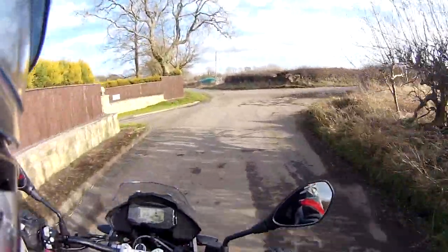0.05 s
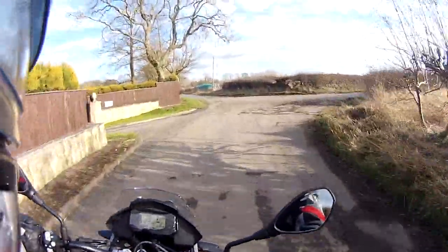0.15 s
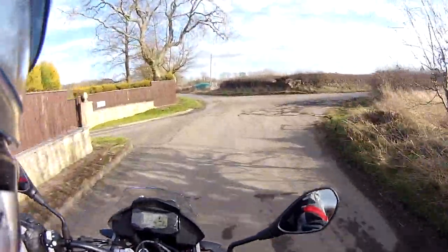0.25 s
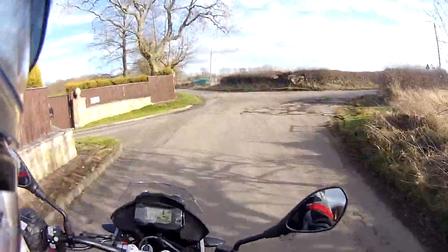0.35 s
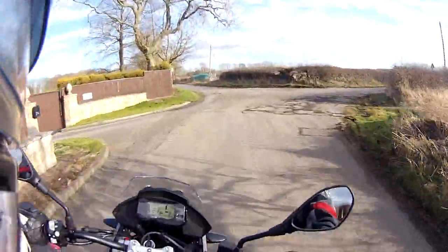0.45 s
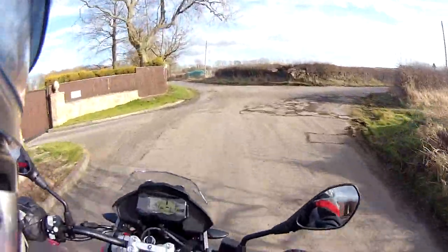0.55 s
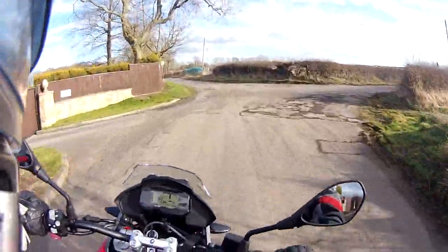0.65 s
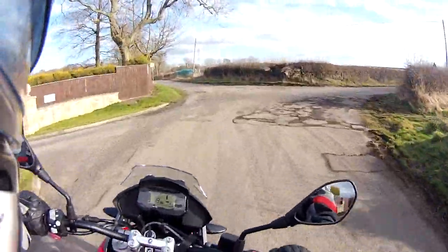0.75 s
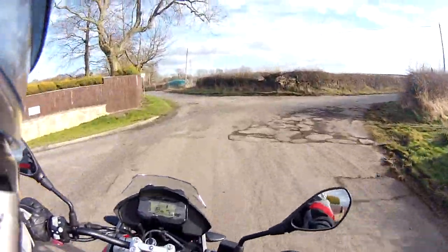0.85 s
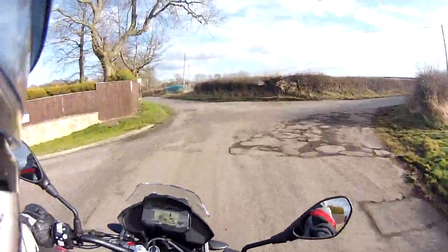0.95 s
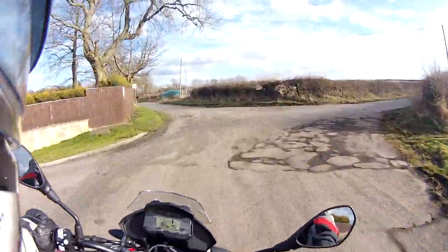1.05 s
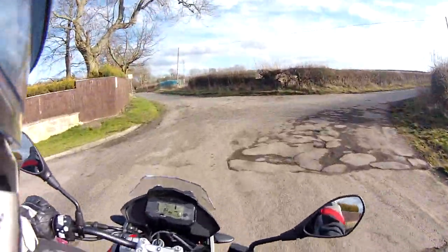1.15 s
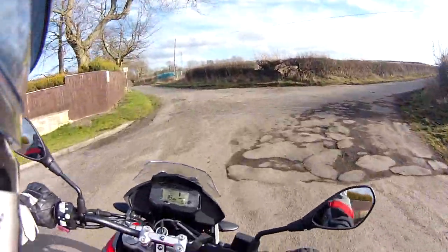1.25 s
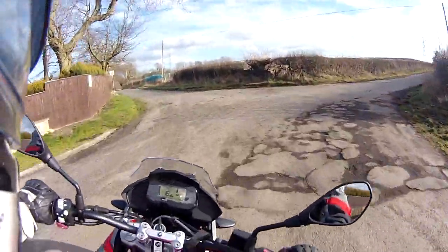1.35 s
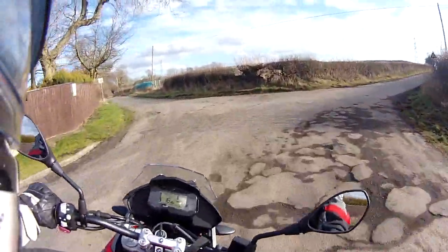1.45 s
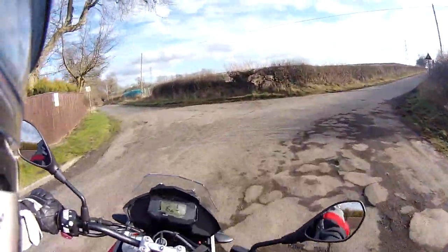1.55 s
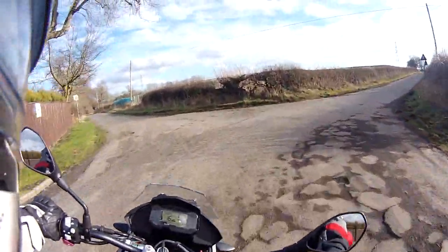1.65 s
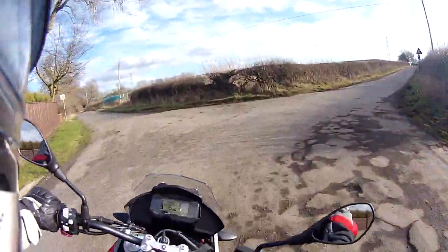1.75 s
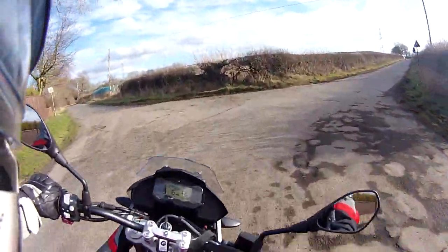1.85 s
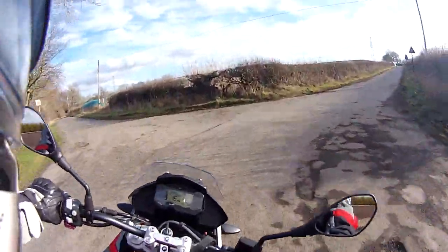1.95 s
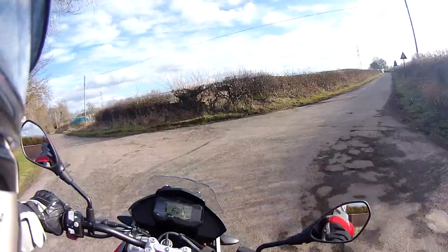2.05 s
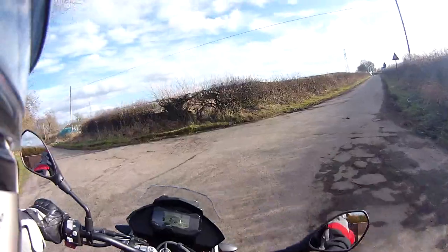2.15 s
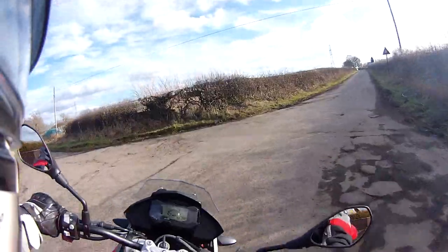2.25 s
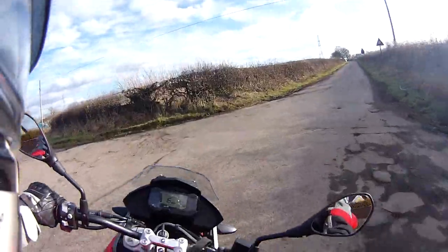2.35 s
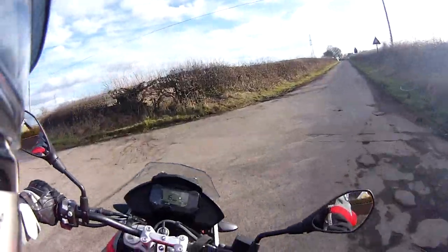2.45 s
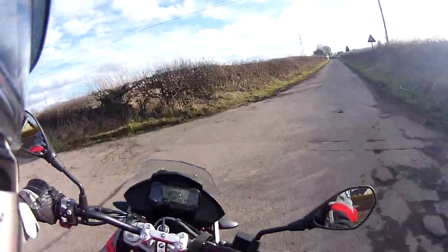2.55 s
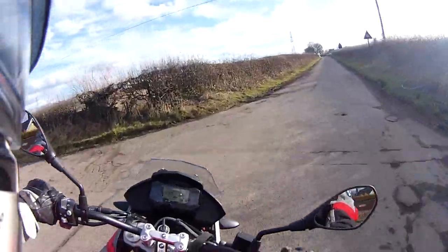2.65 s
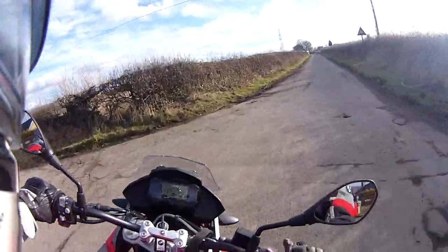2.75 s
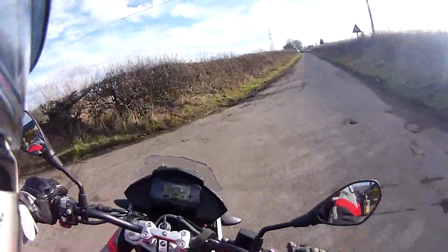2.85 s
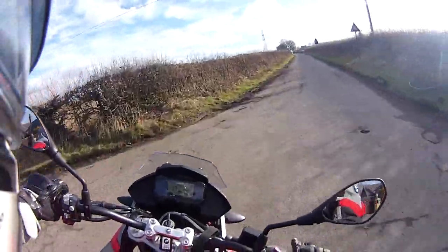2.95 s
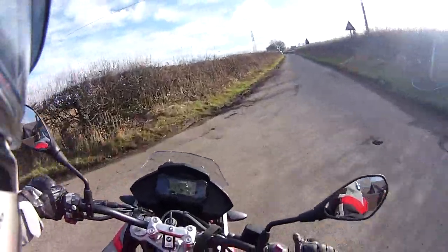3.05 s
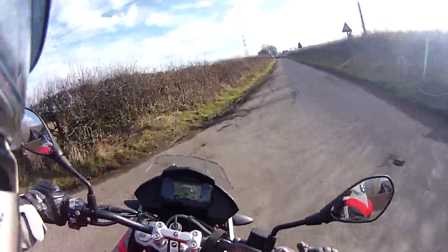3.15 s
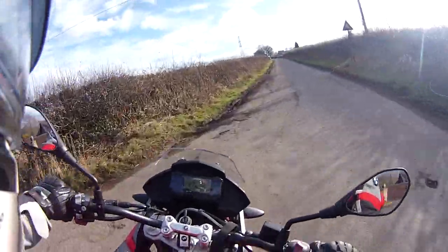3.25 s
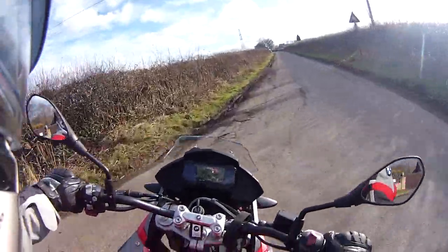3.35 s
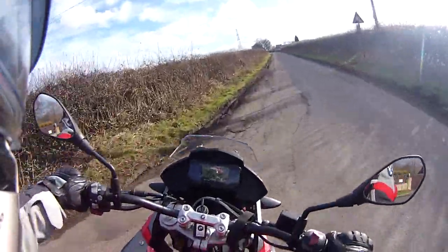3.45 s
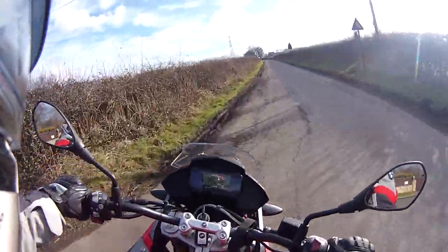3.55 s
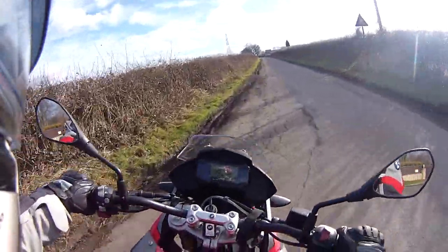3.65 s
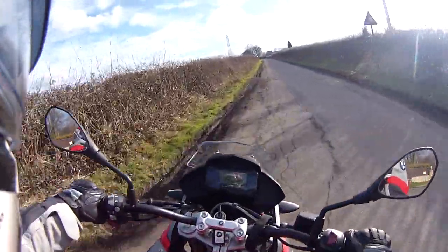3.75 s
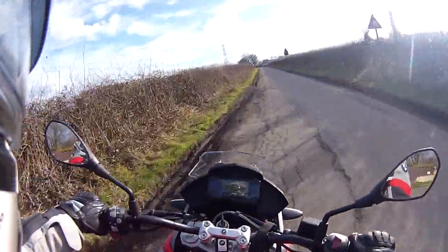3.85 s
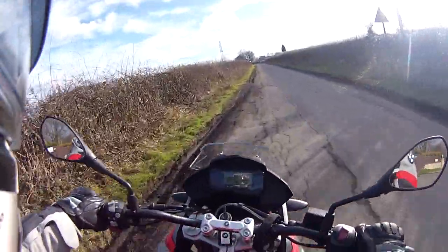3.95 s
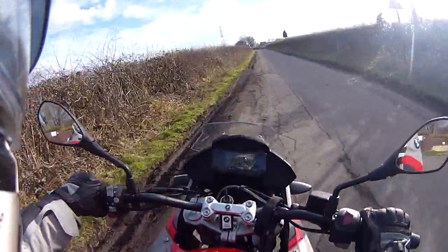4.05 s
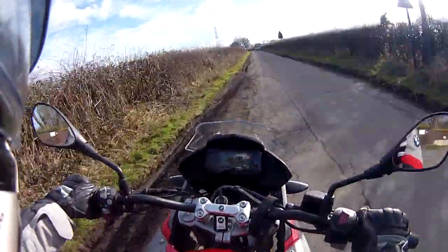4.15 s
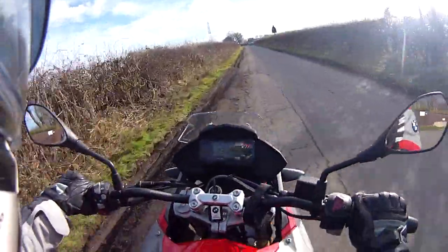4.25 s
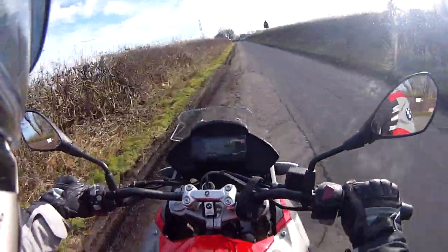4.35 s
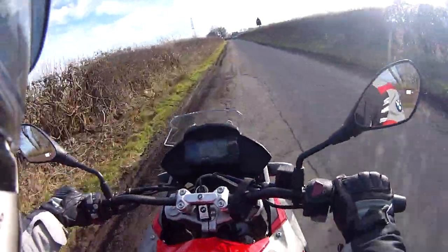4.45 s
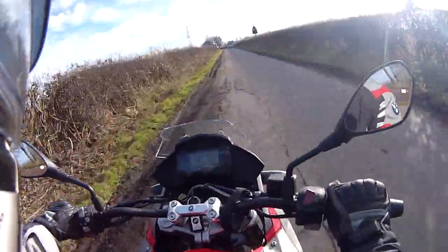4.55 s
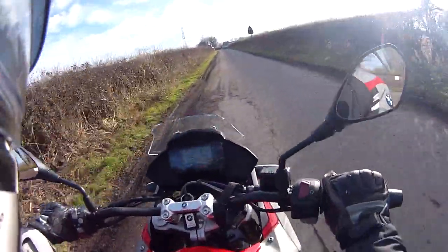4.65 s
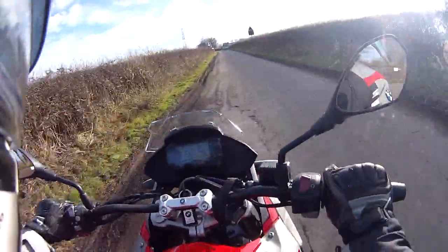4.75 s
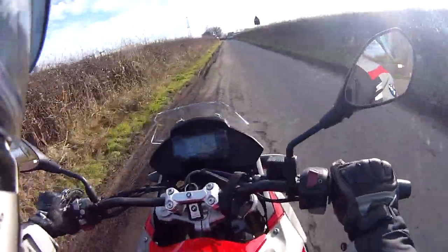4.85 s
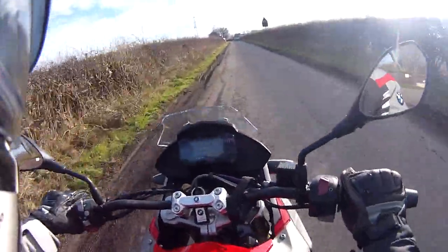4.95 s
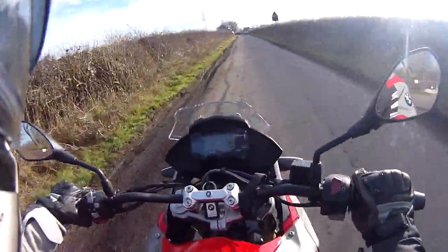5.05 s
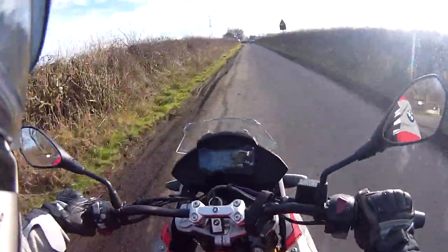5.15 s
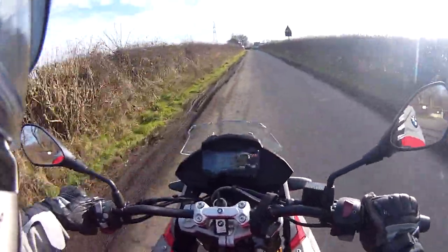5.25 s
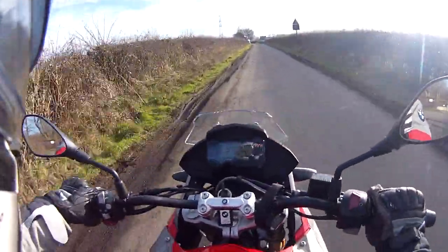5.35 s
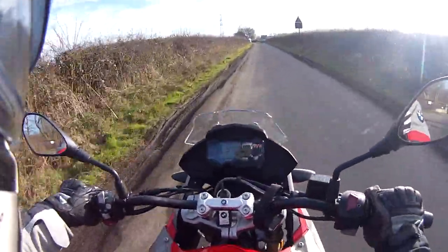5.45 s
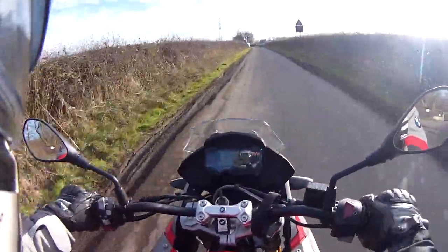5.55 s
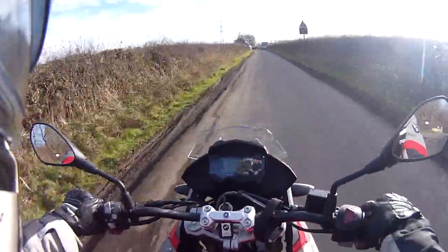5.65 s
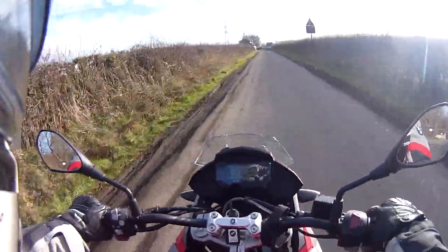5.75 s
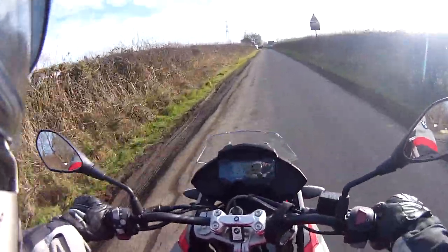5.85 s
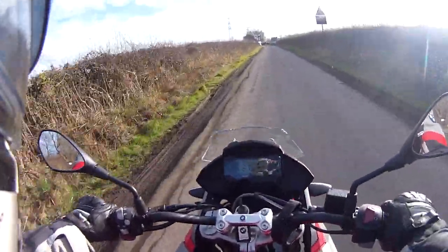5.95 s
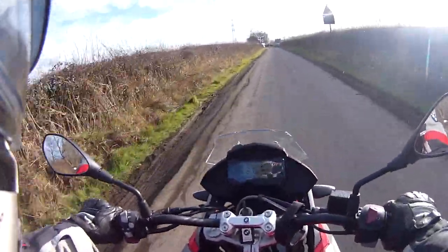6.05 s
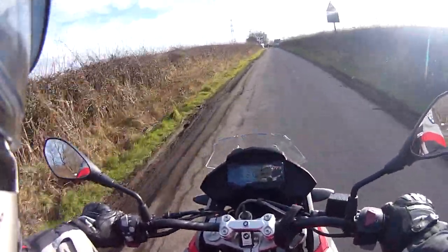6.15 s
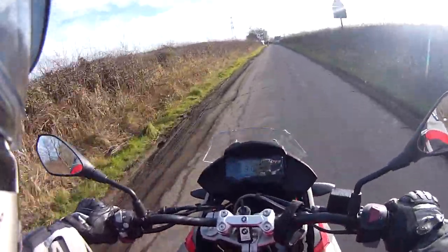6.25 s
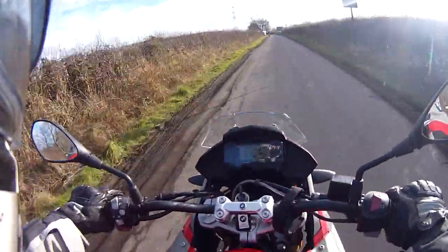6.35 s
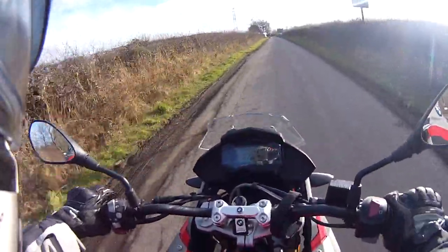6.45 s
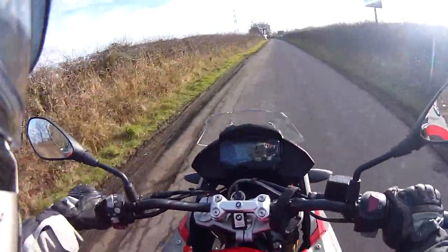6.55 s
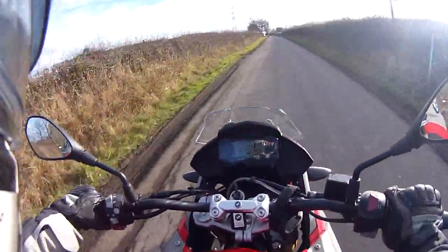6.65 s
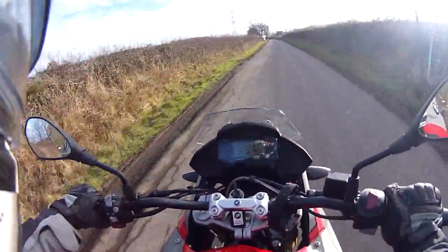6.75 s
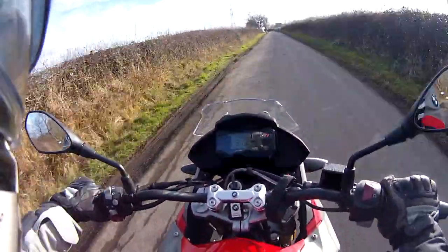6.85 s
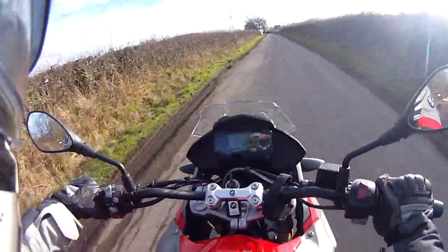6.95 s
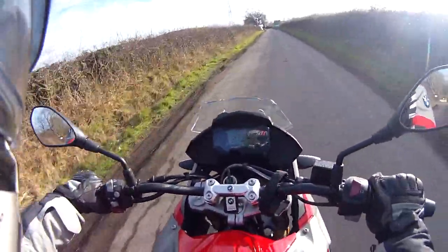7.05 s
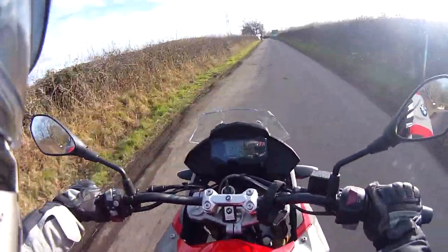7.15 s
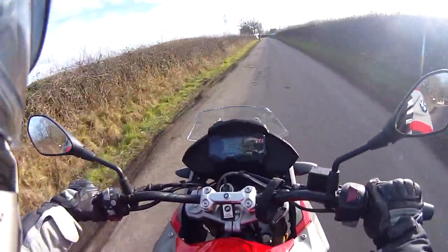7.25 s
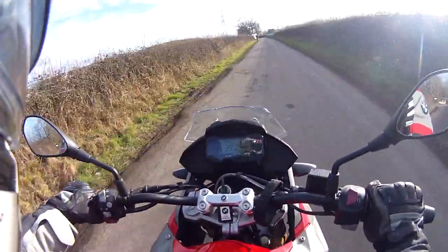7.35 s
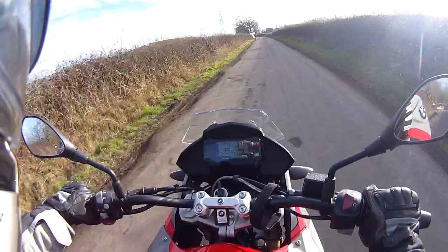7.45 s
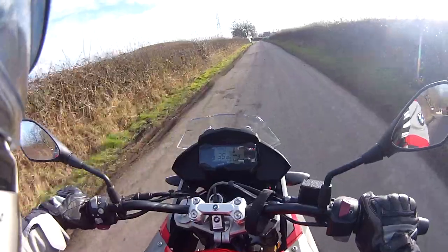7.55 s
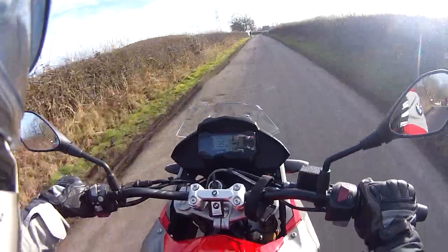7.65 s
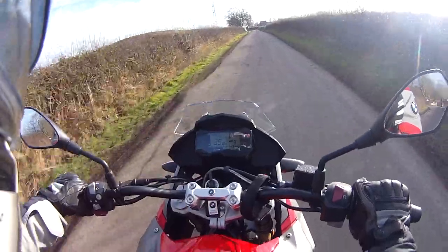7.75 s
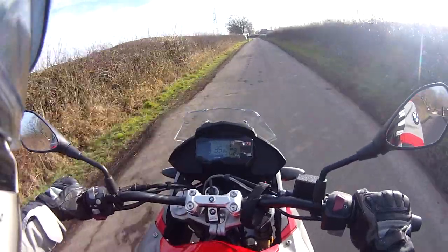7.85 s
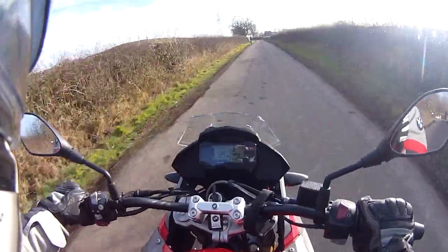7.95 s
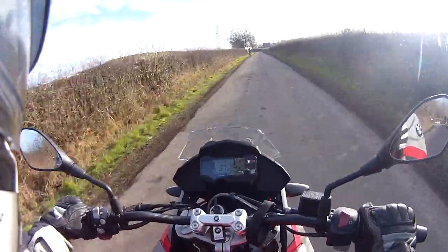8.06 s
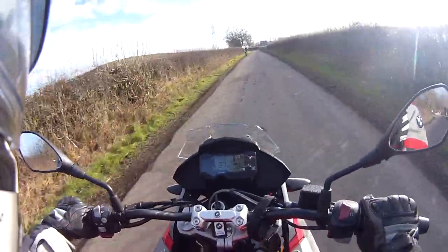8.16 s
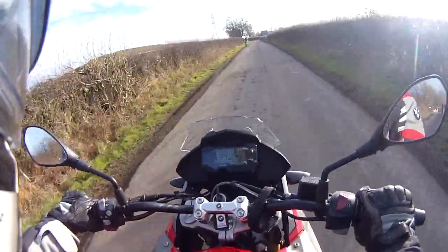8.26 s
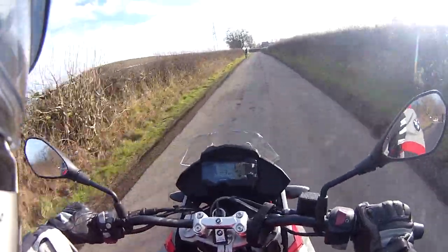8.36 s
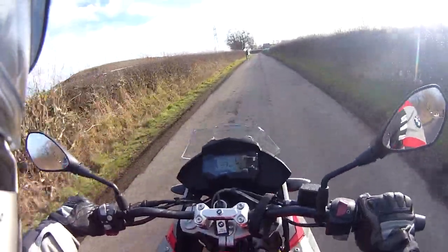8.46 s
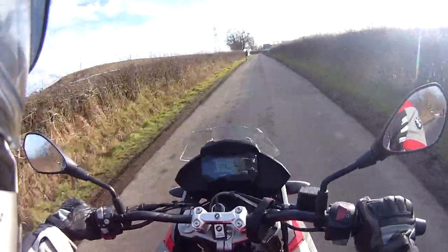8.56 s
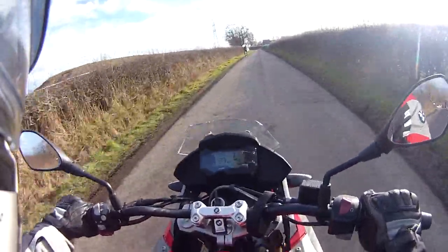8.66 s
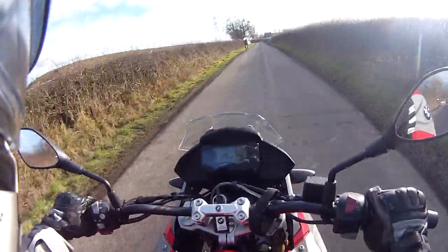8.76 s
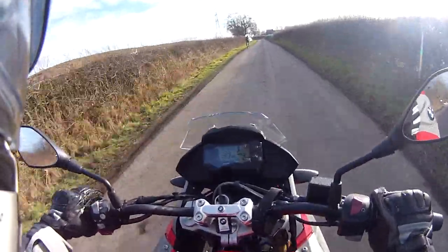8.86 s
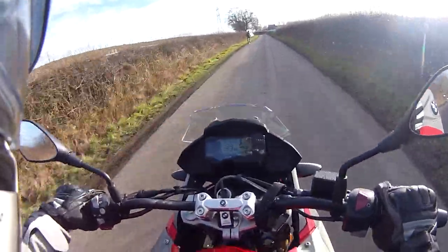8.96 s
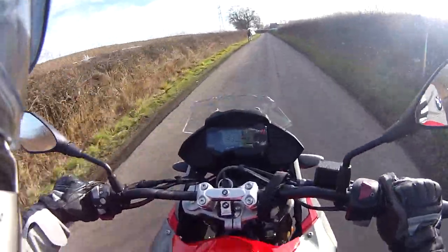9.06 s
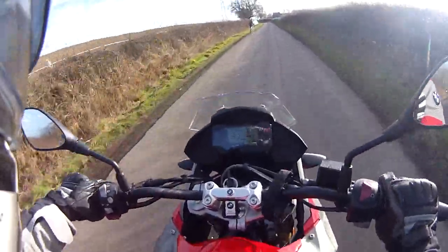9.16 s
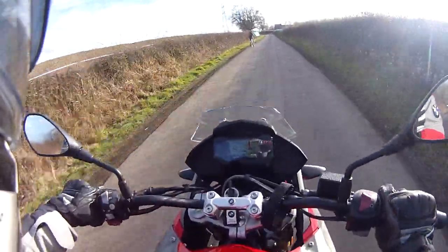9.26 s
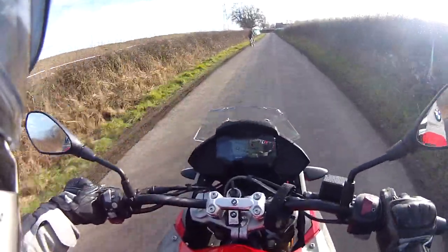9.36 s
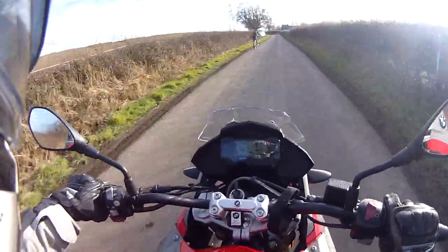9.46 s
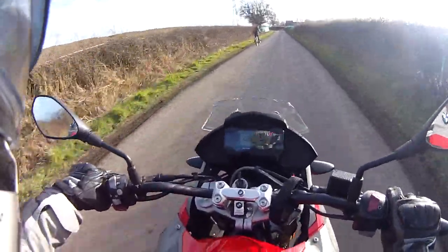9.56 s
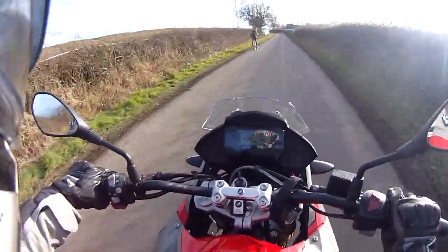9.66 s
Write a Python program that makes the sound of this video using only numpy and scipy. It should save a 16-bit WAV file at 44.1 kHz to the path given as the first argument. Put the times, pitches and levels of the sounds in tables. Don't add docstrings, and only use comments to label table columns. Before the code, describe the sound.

From 0 to 3 s a single-cylinder motorcycle rolls through a bend at low, wavering revs, its separate exhaust thuds soft and lumpy, over valve clatter, chain noise, tyre hiss and a faint thin electric whine. Small grit ticks and rattles accompany the broken surface, with a duller knock near 0.4 s. From about 3 s it pulls harder, the pitch rising steadily to a fast, hollow, ringing throb by 5.6 s. The throttle then closes, with a short rattle, and the note drops sharply around 6 s for a gear change; a brief swish passes from a roadside sign. Power returns and the revs climb steadily to the end at 9.7 s. Wind at the rider's helmet microphone grows from low rumble to strong buffeting, with blunt slaps clustered around 6.2, 6.9, 8.1, 8.6 and 9.4 s, some briefly ducking everything. The sound is close, almost mono, outdoors.

```python
import sys
import numpy as np
from scipy import signal
from scipy.fft import rfft, irfft, next_fast_len
from scipy.io import wavfile
from scipy.ndimage import uniform_filter1d, map_coordinates

SR = 44100
rng = np.random.default_rng(int(sys.argv[2]) if len(sys.argv) > 2 else 0)


def pcm_store(signal):
    levels = np.round(np.clip(np.atleast_2d(signal), -1, 1) * 32767)
    wavfile.write(sys.argv[1], SR, levels.astype(np.int16).T)


def nominal_scale(level):
    x = np.asarray(level, float) / 20
    return 10 ** x


N = 428211
SHIFT_S = 6.0

# (time [s], throttle [0-1])
THROTTLE = [(0, 0.77), (.9, 0.55), (1.05, 0.43), (1.47, 0.68), (1.6, 0.32), (1.8, 0.8), (3.1, 0.86),
            (3.5, 0.95), (4.5, 0.96), (5.555, 0.95), (5.63, 0.45), (6.07, 0.1), (6.2, 0.61), (6.38, 0.69),
            (6.48, 0.99), (7.5, 0.92), (8.85, 0.84), (9.71, 0.75)]


def unit(x):
    return x / np.sqrt(np.mean(x ** 2) + 1e-20)


def along(points, hz):
    f, v = np.transpose(points)
    return np.interp(np.log(hz + 1), np.log(f + 1), v)


def curves(rows):
    s, *cols = np.transpose(rows)
    return [np.interp(np.arange(N) / SR, s, c) for c in cols]


def wobble(rate_hz):
    knots = rng.standard_normal(int(N * rate_hz / SR) + 4)
    return map_coordinates(knots, [np.arange(N) * rate_hz / SR])


def steady(x, size):
    power = uniform_filter1d(uniform_filter1d(x ** 2, size), size)
    return x / np.sqrt(np.abs(power) + 1e-20)


def filtered(x, response):
    m = next_fast_len(N + SR // 2)
    return irfft(rfft(x, m) * response(np.fft.rfftfreq(m, 1 / SR)), m)[..., :N]


def rush(spectrum, patchy_db):
    z = signal.stft(rng.standard_normal(N), nperseg=512)[2]
    field = uniform_filter1d(rng.standard_normal(z.shape), size=6, axis=0)
    field = uniform_filter1d(field, size=10, axis=1)
    x = signal.istft(z * nominal_scale(patchy_db * unit(field)), nperseg=512)[1][:N]
    return unit(filtered(x, lambda hz: nominal_scale(along(spectrum, hz))))


def puff(cycle, sharp):
    return unit(np.exp(sharp * np.cos(2 * np.pi * cycle)))


def firing_hz(cycle):
    return np.gradient(cycle) * SR


def effort(cycle, open_db, shut_db, rise_db, full_hz=100):
    hz = np.minimum(firing_hz(cycle), full_hz)
    return open_db + shut_db * (1 - curves(THROTTLE)[0]) + rise_db * np.log2(hz / min(full_hz, 45))


def exhaust(cycle):
    # (multiple of firing rate, level [dB])
    orders = [(1, -32), (2, -10), (3, -8), (4, 1), (5, -10.5), (6, -13), (7, -2), (8, -6), (10, -3),
              (12, -2), (15, -5)]
    # (frequency [Hz], gain [dB])
    pipe = [(25, -57), (60, 6), (150, 5.5), (190, -2.5), (235, 8.5), (270, 13.5), (330, -4), (450, -4),
            (680, -14), (790, -3.5), (900, -44), (2000, -45), (2600, -27)]
    sound, hz = np.zeros(N), firing_hz(cycle)
    multiple, shape_db = np.transpose(orders)
    db = effort(cycle, open_db=-19.5, shut_db=-12, rise_db=17.5, full_hz=36.55)
    pull = np.clip(5 * curves(THROTTLE)[0] - 3.75, 0, 1)
    low_gear = np.arange(N) < SHIFT_S * SR
    lug_hz, thump_hz = 32.7, 42.2
    shake_db = 2 - 23.5 * np.clip((lug_hz - hz) / 3, 0, 1) * pull
    thump_db = 8.5 * np.clip((thump_hz + 2 - hz) / 3, 0, 1) * pull * low_gear
    for k in range(1, 37):
        drift_db, slip = 1.5 * wobble(7), .008 * k * wobble(12)
        level_db = along(pipe, k * hz) + 1.05 * np.interp(k, multiple, shape_db) + drift_db
        level_db = level_db + (k == 4) * shake_db + (k == 2) * thump_db
        spread = rng.uniform(0, 2 * np.pi) * (k < 11)
        sound += nominal_scale(level_db) * np.sin(2 * np.pi * k * (cycle + 0.028) + spread + slip)
    return nominal_scale(db + 1.27) * steady(sound, size=5000)


def airbox(cycle):
    # (centre [Hz], width [Hz], gain [dB])
    modes = [(1015, 90, -6), (1092, 55, 3.5), (1190, 65, 0), (1275, 70, -5), (1890, 170, -16)]
    lead, lead_low_gear, second, second_low_gear, wander = .17, .13, .29, .05, .009
    hz, low_gear = firing_hz(cycle), np.arange(N) < SHIFT_S * SR
    hard = low_gear * np.clip((hz - 38) / 13, 0, 1)
    turn = cycle + lead + lead_low_gear * hard + wander * (hz / 46) ** 2.5 * wobble(14)
    echo = .5 + .3 * np.log2(hz / 45) + .6 * hard ** 3
    second_late = second + second_low_gear * low_gear + .3 * wander * wobble(3)
    blows = np.zeros(N)
    for late, size in ((0, np.ones(N)), (second_late, echo)):
        slam = np.flatnonzero(np.diff(np.floor(turn - late)) > 0)
        luck = rng.standard_normal((500, 2))[:len(slam)]
        at = np.clip(slam + np.round(1.5 * luck[:, 0]).astype(int), 0, N - 1)
        blows[at] += size[slam] * nominal_scale(1.2 * luck[:, 1])
    gulp = (hz / 44) ** 3.5
    drive = blows + gulp * .008 * puff(cycle - .2, sharp=.5) * rng.standard_normal(N)

    def box(f):
        return sum((-1) ** k * nominal_scale(g) * 1j * f * w / (c * c - f * f + 1j * f * w)
                   for k, (c, w, g) in enumerate(modes))

    def duct(f):
        return (1 + 1j * f / 2300) ** -4 * (1j * f / (700 + 1j * f)) ** 2

    ring = steady(filtered(drive, lambda f: box(f) * duct(f)), size=4000)
    return nominal_scale(effort(cycle, open_db=-17, shut_db=-39, rise_db=36, full_hz=42.35)) * ring


def road(cycle):
    # (frequency [Hz], density [dB per Hz])
    gear_colour = [(150, -9), (300, -1.5), (610, 3), (710, -1.5), (775, 3), (870, 2.5), (1450, 1.5),
                   (1650, -0.5), (1950, 2), (2300, -5.5), (3700, -13.5), (4060, -14.5), (4350, -23),
                   (5200, -58), (8000, -90)]
    # (frequency [Hz], density [dB per Hz])
    tappet_colour = [(2800, -40), (3850, -3), (4120, -0.5), (4400, -19.5), (9000, -29), (12400, -22),
                     (13200, -23), (15400, -40)]
    # (frequency [Hz], density [dB per Hz])
    hiss_colour = [(2650, -25), (4500, 4), (4960, -7), (5670, -2.5), (6320, -8), (6690, -9.5), (7230, -1),
                   (8050, -8.5), (8920, 1), (10100, -4.5), (10300, -4.5), (10900, -3), (12000, -6),
                   (13400, -21), (15400, -27)]
    # (frequency [Hz], density [dB per Hz])
    sign_colour = [(1470, -38), (2500, -15), (2800, -15), (3440, 2), (3920, 5), (4260, -3.5), (5910, -5),
                   (7830, -23), (10800, -4.5), (12600, -11), (15400, -34)]
    # (time [s], gain [dB])
    hedge = [(0, -0.4), (2.9, 1.5), (3.4, 4), (4.08, 4), (4.46, -3), (4.56, 2.8), (5.3, 0.45), (6.4, 3.4),
             (7.1, -0.5), (7.5, 2.6), (8.2, 0.2), (9.71, -2.4)]
    # (time [s], gain [dB])
    potholes = [(.01, 2.5), (1.78, 3), (1.97, 2.5), (2.22, 3), (2.32, 2.2), (3.35, 2.2)]
    jolt_s, sign_s, sign_wide_s, sign_db = 0.023, 6.16, .16, -33.5
    t = np.arange(N) / SR
    near_db = curves(hedge)[0] + sum(db * np.exp(-((t - s) / jolt_s) ** 2) for s, db in potholes)
    gear_db = near_db + effort(cycle, open_db=-29, shut_db=-7, rise_db=3)
    hiss_db = near_db + effort(cycle, open_db=-45, shut_db=-5, rise_db=5.5)
    tappet_db = effort(cycle, open_db=-50.5, shut_db=0, rise_db=-5)
    shake = 0.39 * wobble(11) + 0.17 * wobble(40)
    throb = puff(cycle - .05, sharp=0.059) * puff(2 * cycle, sharp=0.017)
    gear = nominal_scale(gear_db + 3 + shake) * throb * rush(gear_colour, patchy_db=0.62)
    tappets = nominal_scale(tappet_db) * puff(cycle, sharp=0.42) * rush(tappet_colour, patchy_db=2.3)
    hiss = nominal_scale(hiss_db - 2.0) * throb * rush(hiss_colour, patchy_db=1.0)
    passing = np.exp(-((t - sign_s) / sign_wide_s) ** 2)
    swish = nominal_scale(sign_db) * passing * rush(sign_colour, patchy_db=1.8)
    return gear + nominal_scale(shake) * (hiss + swish + tappets)


def wind():
    # (time [s], buffet level [dB])
    air = [(0, -37.5), (.9, -41), (1.6, -37.5), (1.78, -38), (2.6, -35.5), (3.27, -31.5), (4.16, -27),
           (4.6, -36), (5.5, -26.5), (6.3, -30), (6.9, -24.5), (7.05, -34), (7.2, -26), (8.14, -22),
           (8.4, -23.5), (9.4, -22), (9.71, -25.5)]
    # (time [s], buffet gain [dB], flutter gain [dB])
    gusts = [(1.5, 0, 2), (1.77, 1, 7), (2.05, 5.5, 1), (2.25, 5, -4), (4.75, -1.5, 15), (4.95, 7, -1),
             (5.26, 4, 1.5), (6.21, 3.5, 2), (6.55, 2.5, 2.5), (6.76, 4.5, -8), (7.27, -0.5, -5),
             (7.55, 3.5, -2), (8.12, -0.5, 5.5), (8.6, 1.5, 4.5), (8.9, 3.5, 0.5), (9.48, 2.5, 0)]
    # (time [s], peak [dB], pitch [Hz])
    slap_events = [(1.779, -11, 274), (1.971, -6, 250), (2.069, -17, 64.6), (6.011, -8, 95.5),
                   (6.196, -4, 108), (6.214, -14, 86.1), (6.225, -6, 179), (6.601, -1, 158),
                   (6.769, -31, 78.1), (6.904, 0, 78.1), (7.918, -2, 113), (8.073, -1, 156),
                   (8.116, -22, 194), (8.153, 2, 212), (8.461, 2.5, 266), (8.553, -13, 61.5),
                   (8.617, -9, 88.8), (8.644, 1, 111), (8.908, -3, 253), (8.924, -9, 102),
                   (9.249, -46, 229), (9.376, -41, 229), (9.404, 1, 223), (9.471, -3, 118)]
    # (frequency [Hz], density [dB per Hz])
    rumble_colour = [(12, -19), (25, -11.5), (50, -2), (90, -0.5), (140, -2), (250, -11), (500, -57)]
    # (frequency [Hz], density [dB per Hz])
    flutter_colour = [(40, -35), (90, -20), (140, -7.5), (220, -4), (400, -10.5), (800, -20), (2000, -66)]
    gust_s, flutter_over_buffet_db = 0.068, -4
    slaps, t = np.zeros(N + SR), np.arange(-600, 600) / SR
    for s, db, hz in slap_events:
        slap = np.exp(-(2.0 * hz * t) ** 2) * np.sin(2 * np.pi * hz * t - .8)
        slaps[round(s * SR) - 600:][:len(t)] += nominal_scale(db - 4.0) * slap
    s, push_db, flap_db = np.transpose(gusts)
    gust = np.exp(-((np.arange(N) / SR - s[:, None]) / gust_s) ** 2)
    buffet_db = curves(air)[0] + push_db @ gust
    flutter_db = flutter_over_buffet_db + flap_db @ gust
    rumble = unit(nominal_scale(0.31 * wobble(19)) * rush(rumble_colour, patchy_db=-0.34))
    lumps_db = 0.28 * wobble(24) + 0.98 * wobble(45)
    flutter = unit(nominal_scale(lumps_db) * rush(flutter_colour, patchy_db=-1.5))
    return slaps[:N] + nominal_scale(buffet_db + 3.5) * (rumble + nominal_scale(flutter_db) * flutter)


def grit():
    # (time [s], peak [dB], t60 [s], centre [Hz], width [Hz])
    ticks = [(.42, -13.5, 0.081, 1107, 250), (.41, -32, 0.056, 7000, 6550), (.79, -33, .1, 10000, 1200),
             (.915, -36, .12, 9800, 1000), (1.25, -42, .08, 9800, 900), (1.37, -42, .1, 9800, 900),
             (1.96, -41, .03, 9000, 4000), (2.15, -25, .015, 10000, 6000), (2.2, -33, .2, 5330, 1800),
             (2.235, -38, .04, 10000, 2000), (2.333, -30, .04, 10500, 2500), (3.1, -35, .1, 9800, 900),
             (3.613, -28, .03, 8900, 1500), (4.641, -31, .08, 7140, 400), (4.74, -26, .08, 7130, 400),
             (8.154, -32, .02, 9000, 6000), (8.923, -28, .02, 8000, 7000), (5.65, -8.5, 0.17, 1070, 40),
             (1.49, -30, .06, 1100, 300)]
    sound, t = np.zeros(N + SR), np.arange(SR // 6) / SR
    for s, db, t60, hz, width in ticks:
        band = unit(np.interp(t * width, np.arange(2000), rng.standard_normal(2000)))
        envelope = nominal_scale(db - 6 - 60 * t / t60) * (1 - np.exp(-25 * t / t60))
        sound[round(s * SR):][:len(t)] += envelope * band * np.sin(2 * np.pi * hz * t)
    return sound[:N]


def pump(cycle):
    whine_hz, whine_db, fade_db, fade_hz = 10519.5, -55, -18, 34
    db = whine_db + fade_db * np.log2(np.maximum(firing_hz(cycle) / fade_hz, 1))
    phase = 2 * np.pi * np.cumsum(whine_hz + 1.2 * wobble(15)) / SR
    return nominal_scale(db + 2 + 0.58 * wobble(8)) * np.sin(phase)


def scene():
    # (time [s], firing rate [Hz])
    engine = [(0.0, 28.41), (0.825, 21.508), (1.132, 27.951), (1.584, 25.274), (1.802, 30.95),
              (2.042, 26.062), (2.185, 27.18), (2.915, 28.457), (3.667, 33.722), (4.764, 46.935),
              (4.783, 46.144), (5.188, 52.509), (5.596, 55.748), (5.997, 31.68), (6.249, 42.408),
              (6.593, 41.434), (8.404, 52.385), (9.72, 58.943)]
    first_turn = 1.6448
    cycle = first_turn + np.cumsum(curves(engine)[0]) / SR
    mono = exhaust(cycle) + airbox(cycle) + road(cycle) + wind() + grit() + pump(cycle)
    return np.array([mono, mono])


def band_limit(x):
    return signal.sosfilt(signal.butter(12, 15670, fs=SR, output="sos"), x)


def record(dry):
    # (time [s], drop [dB])
    ducks = [(5.6, 2), (6.229, 2.5), (6.6, 1.5), (6.778, 4), (7.53, 2.5), (7.921, 3), (8.157, 10),
             (8.652, 1.5), (8.931, 3.5), (9.407, 2.5)]
    attack_s, release_s, limit, top_hz = 0.0012, 0.42, .95, 15300
    t = np.arange(N) / SR
    duck_db = sum(-db * np.clip((t - s) / attack_s, 0, 1) * np.exp(-np.maximum(t - s, 0) / release_s)
                  for s, db in ducks)
    x = dry * nominal_scale(duck_db)
    x = x / (1 + np.abs(x / limit) ** 6) ** (1 / 6)
    x = filtered(x, lambda hz: hz < top_hz)
    # (frequency [Hz], gain [dB])
    trace_colour = [(100, -36.5), (2500, -39), (5000, -24.5), (14000, -26.5)]
    trace = filtered(np.roll(x[0], 3000) * wobble(9), lambda hz: nominal_scale(along(trace_colour, hz)))
    return band_limit(x + [trace, -trace])


dry = scene()
out = record(dry)
pcm_store(out)
```